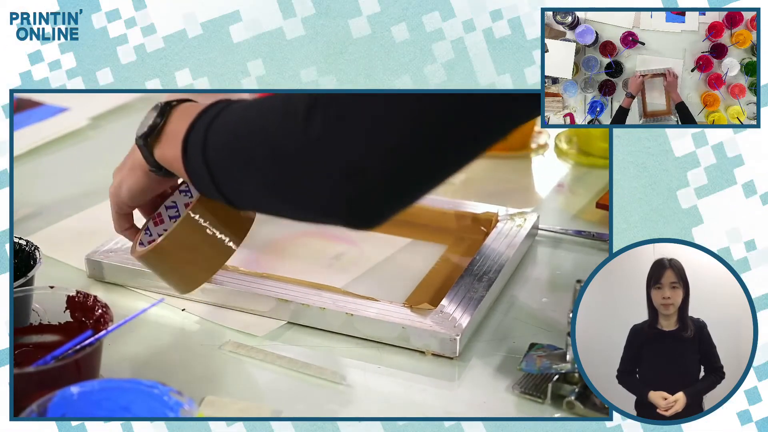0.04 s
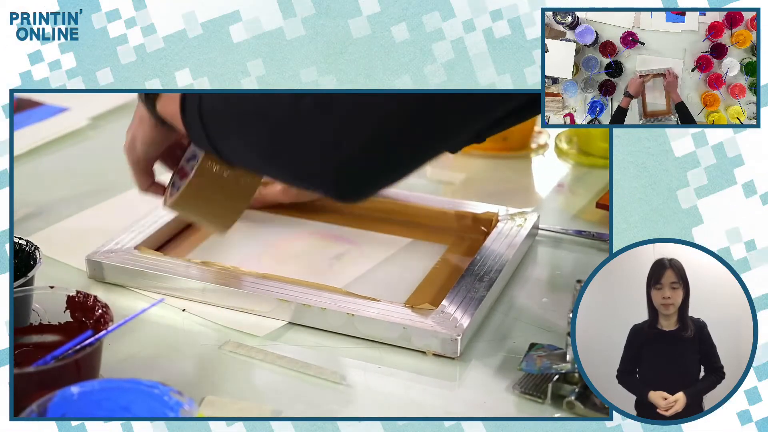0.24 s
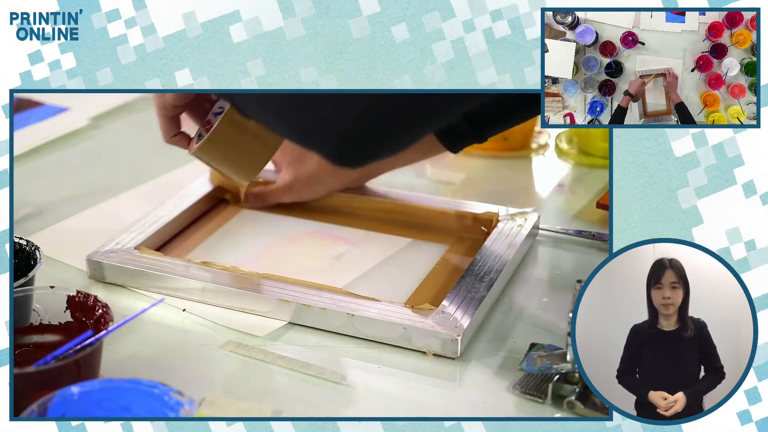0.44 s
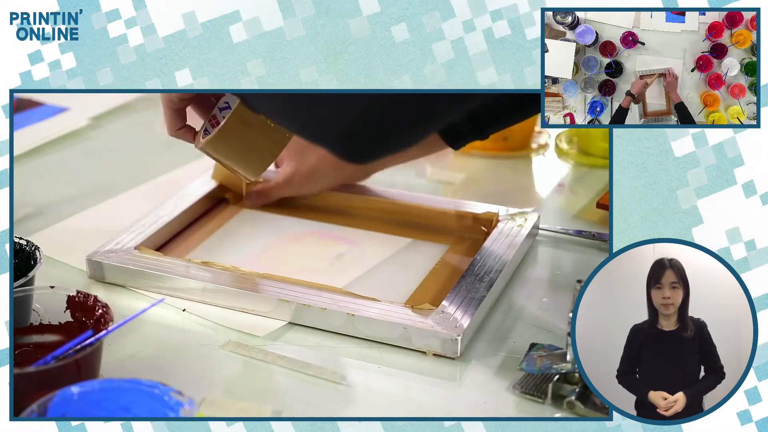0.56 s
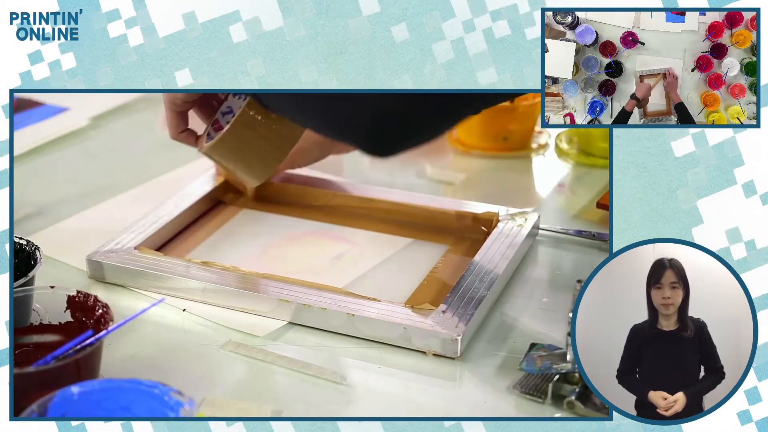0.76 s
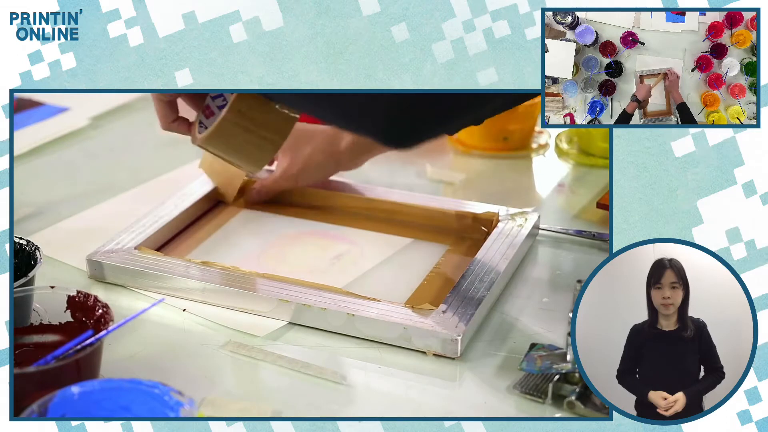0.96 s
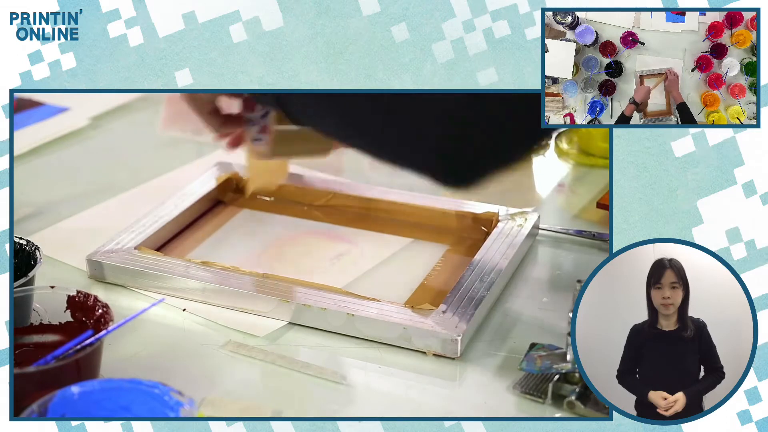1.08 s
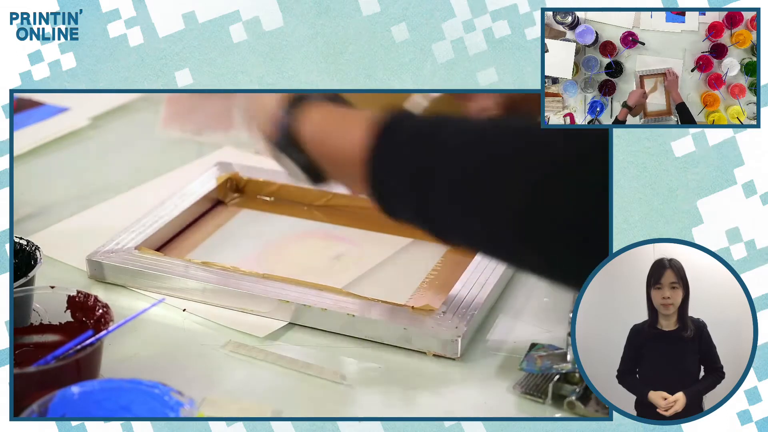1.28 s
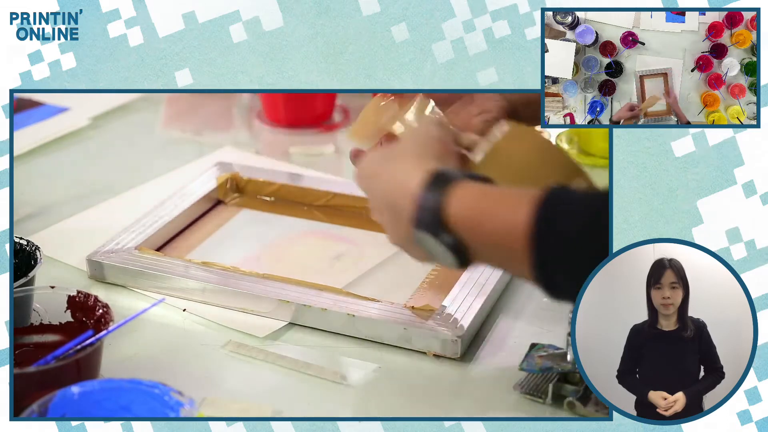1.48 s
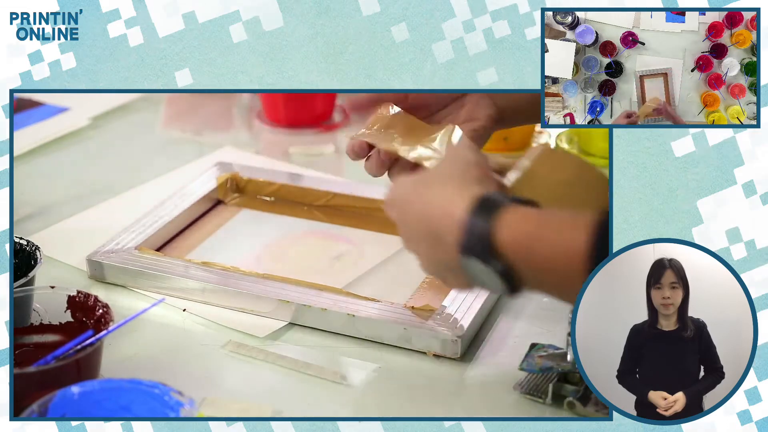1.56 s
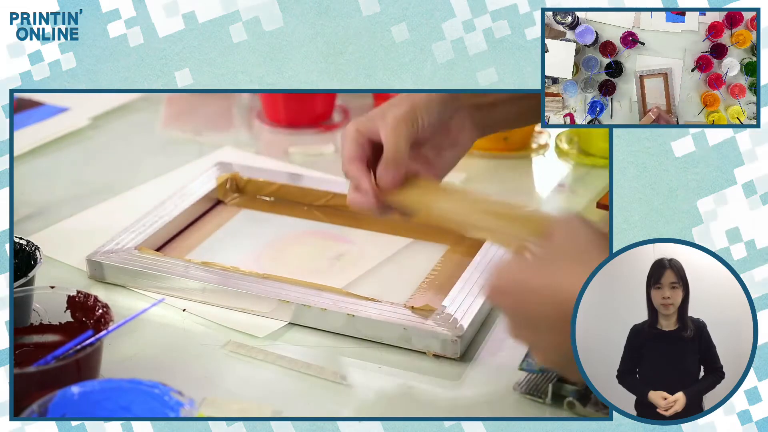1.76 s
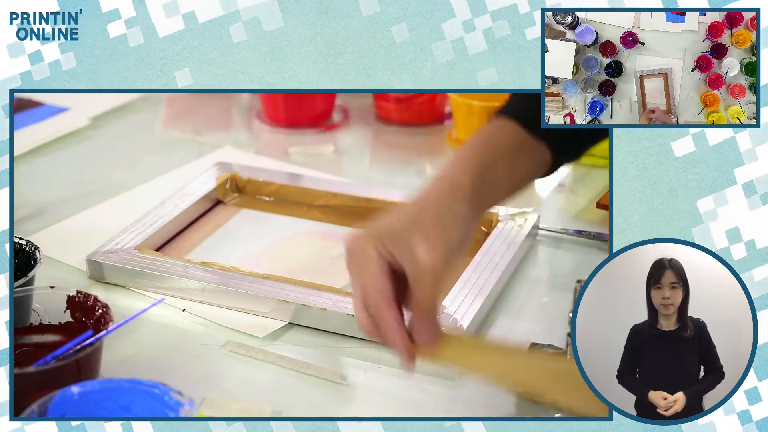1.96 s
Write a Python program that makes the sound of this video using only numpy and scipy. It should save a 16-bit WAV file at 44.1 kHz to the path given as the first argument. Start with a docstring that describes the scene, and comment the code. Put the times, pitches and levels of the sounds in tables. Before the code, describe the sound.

Dry, bright snaps of sticky tape quicken into a short buzzing rip, then loud cracks and another crackling run, with light frame knocks, film rustle and hollow roll pops, heard close with room echoes.

```python
"""Hands rub and loose film rustles over a faint room noise, and at once packing tape starts to snap.
It is pulled off its roll and laid along a metal frame, close to the microphone in a live room.
The glue lets go in single snaps, made of short shaped noise bursts; some flap the taut film, which pushes air.
The frame knocks and the hollow roll pops as fading tones, and stretched glue ticks as tiny noise bursts.
A fast pull packs the bursts into a stick-slip rasp. Fading noise serves as the echoes of the room."""
import sys
import numpy as np
from scipy import signal
from scipy.fft import rfft, irfft, next_fast_len
from scipy.io import wavfile
from scipy.ndimage import uniform_filter1d

SR = 44100
rng = np.random.default_rng(int(sys.argv[2]) if len(sys.argv) > 2 else 0)


def to_wav(s):
    """Save 16-bit WAV."""
    ch = np.atleast_2d(s).T  # columns
    pcm = np.round(np.clip(ch, -1, 1) * 32767)  # PCM
    wavfile.write(sys.argv[1], SR, pcm.astype(np.int16))


N = 89170  # samples, about two seconds

# Hands rub the roll and the frame: start_s, length_s, level_db
RUBS = [(0, 0.012, -48), (.06, 0.018, -44.5), (.075, 0.075, -52), (.511, 0.017, -41.5),
        (1.195, 0.03, -47.5), (1.912, 0.054, -58)]
# Tone colour of the rubbing: freq_hz, gain_db
RUB_COLOUR = [(60, -6), (250, -2), (520, 6), (800, -0.5), (1400, -17), (4000, -31)]
# Loose film rustles: start_s, length_s, level_db
RUSTLES = [(0, 0.18, -58.5), (.285, 0.061, -51.5), (.41, 0.029, -55.5), (.668, 0.09, -33.5),
           (1.148, 0.082, -43), (1.6, 0.065, -65), (1.915, 0.067, -59), (1.995, 0.034, -65.5)]
# Tone colour of the rustling and of the glue ticks: freq_hz, gain_db
RUSTLE_COLOUR = [(200, -20), (1500, -2.5), (3800, 6.5), (7000, 3), (10000, -1), (16000, -14)]
CRACKLES_PER_S, CRACKLE_SPREAD_DB = 1000, 3
FADE_S = 0.0096  # each stroke of rubbing, rustling or ticking fades in and out over this time

# Tone colour of the steady room noise: freq_hz, gain_db
ROOM_NOISE_COLOUR = [(12, -17), (20, 9.5), (43, -2.5), (234, -15.5), (377, -13), (446, -10.5), (1150, -19),
                     (2820, -24.5), (3440, -27.5), (16000, -32)]
ROOM_NOISE_DB = -56.5

# Time the echoes take to fade by 60 dB: freq_hz, fade_s
ROOM_T60 = [(100, 3), (1000, 0.7), (4000, 0.76), (9000, 0.62), (15000, 0.15)]
# Strength of the echo tail: freq_hz, gain_db
ROOM_COLOUR = [(60, -14.5), (700, -11.5), (1800, -8.5), (3200, -11), (4400, -11.5), (5600, -12.5),
               (9000, -13), (15000, -9.5)]
EARLY_DB, EARLY_DECAY_S = -16, .008  # quick echoes

# The glue lets go: start_s, level_db, body_db, top_treble_db, film_ring_hz
SNAPS = [(0.009, -15.5, -8.5, -3, 5300), (0.0619, -12.5, -10, -6, 6360), (0.071, -24, -4, -2, 6300),
         (0.1414, -8.5, -6, -5, 5140), (0.1444, -11.5, -1, -11, 3500), (0.2611, -9, 4, 0, 9400),
         (0.2669, -8.5, 6, 3.5, 8700), (0.342, -27, -9, 7, 5400), (0.35, -9, -35, -10, 8200),
         (0.413, -19, -26, -18, 4000), (0.427, -5, -5, -10, 5150), (0.433, -11.5, 1.5, 1, 4060),
         (0.4382, -4.5, 4.5, -1.5, 9200), (0.5128, -3, 2, 2, 5840), (0.5198, -1, 1.5, -11, 3170),
         (0.53, -6.5, 1, -1, 5200), (0.5612, 2.5, -5.5, -13, 4600), (0.593, -1.5, 2.5, -6, 9200),
         (0.6023, 4, -1, -8, 5100), (0.607, -9.5, -5, -11, 4830), (0.6324, -1.5, -27, -8, 5040),
         (0.6636, -5.5, -6.5, -15, 8800), (0.6701, -2.5, -1.5, -5, 6640), (0.6733, -5, -11, -5, 6800),
         (0.7567, 9, -9.5, -12, 8450), (0.7641, 6, -3.5, -20, 5200), (0.7848, 9.5, -5.5, -26, 10300),
         (0.792, 1.5, -16, -5, 3560), (0.903, -13.5, -7, -19, 3120), (0.9206, 4, 1, -6.5, 4230),
         (0.926, -9, -21, -5, 4800), (0.934, -11, -12, -11, 7200), (1.0568, -15, -15, -17, 6860),
         (1.061, -10, -8, -3.5, 3100), (1.069, -20, -12, -7, 3670), (1.112, 1.5, -0.5, -13, 3700),
         (1.1175, 0, -11.5, -8, 3500), (1.1236, -2, -3.5, -4.5, 3020), (1.1443, 5.5, -4, -20, 3120),
         (1.1474, 1, -10, -9, 2950), (1.16, -11, -2, -10, 3340), (1.174, -12.5, 0, -15, 4150),
         (1.187, -9, -3, -13, 7000), (1.1959, -1.5, -5.5, -2.5, 7030), (1.2091, -5, -9, -13, 6430),
         (1.211, -12.5, -14, 3, 6900), (1.215, -9.5, -27, -9, 3180), (1.751, -19, 4.5, -6, 5800),
         (1.8008, -27, -7, -24, 4960), (1.8307, -20.5, -4.5, -20.5, 7150)]
# Tone colour of a snap: freq_hz, gain_db
SNAP_COLOUR = [(40, -16.5), (150, -2), (480, 2), (900, -1), (1500, -3), (2150, -1), (2650, -7),
               (3100, -0.5), (5000, -2), (9000, -2.5), (12000, -1), (16000, -6.5)]
SNAP_HOLD_S, SNAP_DECAY_S = 0.00067, 0.0017
RISE_S = .00015  # how fast the burst of a crack swells
RING_DB, RING_OCTAVES = 6.5, .22  # boost at the film's ring, and how far it spreads to each side
RELEASE_KICK, KICK_HZ = 3.6, 2270  # size of the dull first jerk, and the pitch above which it weakens
GLUE_DAMPING = 1.5  # life of the film's ring over that of the burst

# Tape pressed down knocks the frame: start_s, level_db
KNOCKS = [(0.0627, -36), (0.2612, -32), (0.2676, -32.5), (.521, -36.5), (1.196, -36)]
# Tones of the frame, with the time to fade by 60 dB: pitch_hz, level_db, fade_s
FRAME_TONES = [(326, -5, 0.022), (544, -5, 0.023), (648, -4, 0.033), (820, -15.5, 0.012)]

# The film flaps and pushes air: start_s, peak_db
FLAPS = [(.2613, -27), (.4385, -34), (0.5614, -44), (.5928, -27), (0.7555, -33), (0.7841, -34),
         (0.9207, -29.5), (1.112, -26.5), (1.1453, -30.5)]

# Stretched glue ticks faintly under tension: start_s, length_s, level_db
TENSION = [(.44, 0.28, -56), (.89, 0.103, -47.5)]
TICKS_PER_S = 74

# Some snaps ring the hollow roll, at one pitch or several at once: start_s, level_db, pitch_hz
ROLL_RINGS = [(0.513, -24.5, 432), (.5614, -20, 1630), (0.5609, -23.5, 2360), (.5616, -28, 680),
              (0.9213, -24, 1297), (1.145, -23.5, 1380), (1.209, -31, 500)]
ROLL_T60_S = .010  # time to fade by 60 dB

# Course of the fast pull: time_s, slips_per_s, level_db, film_ring_hz, treble_edge_hz
PULL = [(0.6831, 215, 2, 6700, 14000), (.689, 305, 3, 6200, 8200), (0.704, 262, 5, 6600, 10900),
        (.714, 262, 4, 6800, 10500), (.722, 300, 1.5, 6700, 11500), (.729, 305, 2, 6900, 15000),
        (0.7392, 255, 8.5, 9200, 15000)]
# Tone colour of one slip: freq_hz, gain_db
SLIP_COLOUR = [(40, -16.5), (220, 1.5), (380, 0.5), (900, -4.5), (2600, -8.5), (3250, 2), (4400, -17),
               (5300, 6), (5950, -9.5), (6600, 0.5), (7600, -7.5), (10000, -2.5), (12200, -9), (14500, -5)]
SLIP_HOLD_S, SLIP_DECAY_S = (.0007, .0013), .0003  # the hold lengthens from the start of the pull to its end
EDGE_DB_PER_OCTAVE = 15  # treble loss above the edge

TOP_HZ = 15850  # nothing is kept from here up


def amp(db):
    """Turn decibels into gain."""
    return 10 ** (np.asarray(db) / 20)


def unit(x):
    """Scale a sound to an rms (average strength) of 1."""
    return x / np.sqrt(np.mean(x ** 2) + 1e-20)


def along(points, hz):
    """Read a value between (frequency, value) points on a logarithmic frequency axis."""
    freqs, values = np.transpose(points)
    return np.interp(np.log(hz + 1), np.log(freqs + 1), values)


def filtered(x, response):
    """Change the strength of each frequency in x by the given response."""
    size = next_fast_len(len(x) + SR // 4)
    hz = np.fft.rfftfreq(size, 1 / SR)
    return irfft(rfft(x, size) * response(hz), size)[:len(x)]


def coloured(x, points):
    """Give x a tone colour, at an rms of 1."""
    return unit(filtered(x, lambda hz: amp(along(points, hz))))


def causal(db):
    """Build a filter with these gains that reacts as early as possible (minimum phase)."""
    cepstrum = irfft(np.log(amp(db)))
    half = len(cepstrum) // 2
    cepstrum[1:half] *= 2
    cepstrum[half + 1:] = 0
    return np.exp(rfft(cepstrum))


def add(track, start_s, x):
    """Mix x into the track at a given time."""
    i = max(round(start_s * SR), 0)
    track[i:i + len(x)] += x[:max(N - i, 0)]


def strokes(rows):
    """Loudness curve of strokes with soft edges."""
    t = np.arange(N) / SR
    level = np.zeros(N)
    for start_s, length_s, level_db in rows:
        inside_s = np.minimum(t - start_s, start_s + length_s - t)
        level += amp(level_db) * np.clip(inside_s / FADE_S + .5, 0, 1)
    return level


def rubbing():
    """Hands rub the roll and the frame: dull noise in strokes."""
    return strokes(RUBS) * coloured(rng.standard_normal(N), RUB_COLOUR)


def rustling():
    """Loose film rustles: many fine crackles of random sign and size."""
    hits = rng.random(N) < CRACKLES_PER_S / SR
    sizes = rng.choice([-1, 1], N) * amp(CRACKLE_SPREAD_DB * rng.standard_normal(N))
    return strokes(RUSTLES) * coloured(hits * sizes, RUSTLE_COLOUR)


def room_noise():
    """Steady faint noise of the room."""
    return amp(ROOM_NOISE_DB) * coloured(rng.standard_normal(N), ROOM_NOISE_COLOUR)


def room_response(gap_s=.003, build_s=0.00079):
    """Quick echoes off the table, plus the long tail of the walls, which fades differently by pitch."""
    hz, t, noise = signal.stft(rng.standard_normal(SR), SR, nperseg=256)
    t60 = along(ROOM_T60, hz)[:, None]
    # Even out the strength of long and short fades before colouring them
    gain = amp(along(ROOM_COLOUR, hz))[:, None] * np.sqrt(2 * np.log(1000) / (t60 * SR))
    fade = np.exp(-np.log(1000) * t / t60)
    tail = signal.istft(noise * gain * fade, SR, nperseg=256)[1]
    t = np.arange(len(tail)) / SR
    early = rng.standard_normal(len(t)) * np.exp(-t / EARLY_DECAY_S) * (t > gap_s)
    return tail * (1 - np.exp(-t / build_s)) + amp(EARLY_DB) * early / np.linalg.norm(early)


def room(x, count=5, size=900):
    """Short slices take turns through a few random echo patterns, so no single one colours everything."""
    place = np.arange(N) // size % count
    echoes = np.zeros(N)
    for k in range(count):
        echoes += signal.fftconvolve(x * (place == k), room_response())[:N]
    return echoes


def crack(colour, ring_hz, hold_s, decay_s, size=2048):
    """A fracture runs along the glue: a jerk and a short burst ring the film until the glue grips again."""
    t, hz = np.arange(size) / SR, np.fft.rfftfreq(size, 1 / SR)
    envelope = (1 - np.exp(-t / RISE_S)) * np.exp(-np.maximum(t - hold_s, 0) / decay_s)
    jerk = RELEASE_KICK / (1 + 1j * hz / KICK_HZ) ** 2
    burst = jerk + rfft(rng.standard_normal(size) * envelope)
    # Flatten the burst's broad colour, so that the wanted colour and ring replace it
    local_db = 10 * np.log10(uniform_filter1d(abs(burst) ** 2, size=50) + 1e-9)
    ring_db = RING_DB * np.exp(-(np.log2((hz + 1) / ring_hz) / RING_OCTAVES) ** 2)
    snap = irfft(burst * causal(colour(hz) + ring_db - local_db))
    damped = snap * np.exp(-np.maximum(t - hold_s - decay_s, 0) / (GLUE_DAMPING * decay_s))
    return damped * np.linalg.norm(snap) / np.linalg.norm(damped)  # keep the energy


def snaps():
    """Slow peeling: the glue gives way one snap at a time."""
    out = np.zeros(N)
    for start_s, level_db, body_db, top_db, ring_hz in SNAPS:
        shelves = [(1900, body_db), (3000, 0), (9300, 0.0068), (12400, top_db)]
        colour = lambda hz: along(SNAP_COLOUR, hz) + along(shelves, hz)
        add(out, start_s, amp(level_db) * crack(colour, ring_hz, SNAP_HOLD_S, SNAP_DECAY_S))
    return out


def fading_tone(t, pitch_hz, t60_s):
    """A pure tone that fades by 60 dB in t60_s."""
    return np.sin(2 * np.pi * pitch_hz * t) * np.exp(-np.log(1000) * t / t60_s)


def knocks():
    """The frame lies on the table, so its tones die quickly."""
    out, t = np.zeros(N), np.arange(SR // 10) / SR
    knock = sum(amp(db) * fading_tone(t, pitch_hz, fade_s) for pitch_hz, db, fade_s in FRAME_TONES)
    for start_s, level_db in KNOCKS:
        add(out, start_s, amp(level_db) * knock)
    return out


def flaps(push_s=0.0042, rise_s=0.00091, low_hz=35):
    """The jerking film pushes the air and sucks it back."""
    out, t = np.zeros(N), np.arange(SR // 10) / SR
    movement = t * np.exp(-t / push_s) * (1 - np.exp(-t / rise_s))
    push = np.gradient(movement) * SR
    push = signal.sosfilt(signal.butter(2, low_hz, "high", fs=SR, output="sos"), push)
    for start_s, peak_db in FLAPS:
        add(out, start_s, amp(peak_db) * push / push.max())
    return out


def ticks(spread_db=4):
    """Single threads of stretched glue part at random: small bursts of fading noise."""
    sizes = (rng.random(N) < TICKS_PER_S / SR) * amp(spread_db * rng.standard_normal(N))
    # Each hit starts a fade
    envelope = signal.lfilter([1], [1, -np.exp(-1 / (SNAP_DECAY_S * SR))], sizes)
    return strokes(TENSION) * coloured(envelope * rng.standard_normal(N), RUSTLE_COLOUR)


def roll():
    """The hand damps the roll, so it gives only a short hollow pop."""
    out, t = np.zeros(N), np.arange(SR // 10) / SR
    for start_s, level_db, pitch_hz in ROLL_RINGS:
        add(out, start_s, amp(level_db) * fading_tone(t, pitch_hz, ROLL_T60_S))
    return out


def rasp(jitter_s=.00015, scatter_db=1):
    """Fast peeling: the tape sticks and slips almost regularly, in bursts that grow longer."""
    times, *columns = np.transpose(PULL)
    out, s = np.zeros(N), times[0]
    while s < times[-1]:
        late, louder = rng.standard_normal(2)
        rate, level_db, ring_hz, edge_hz = [np.interp(s, times, c) for c in columns]
        edge_loss = lambda hz: EDGE_DB_PER_OCTAVE * np.log2(np.maximum(hz / edge_hz, 1))
        colour = lambda hz: along(SLIP_COLOUR, hz) - edge_loss(hz)
        hold_s = np.interp(s, times[[0, -1]], SLIP_HOLD_S)
        slip = crack(colour, ring_hz, hold_s, SLIP_DECAY_S)
        add(out, s + jitter_s * late, amp(level_db + scatter_db * louder) * slip)
        s += 1 / rate
    return out


def scene():
    """Tape and hands with their echoes, over the steady room noise."""
    tape = rubbing() + rustling() + snaps() + knocks() + flaps() + ticks() + roll() + rasp()
    return (tape + room(tape) + room_noise())[None]


def record(dry):
    """The recorder keeps nothing above its band limit."""
    return np.array([filtered(x, lambda hz: hz < TOP_HZ) for x in dry])


dry = scene()
out = record(dry)
to_wav(out)
```